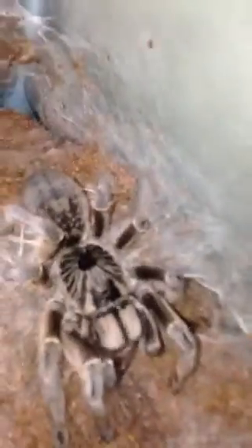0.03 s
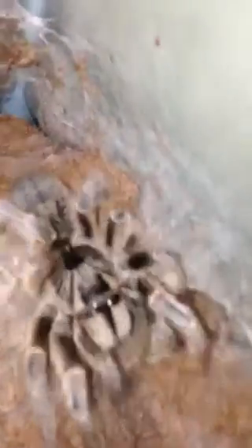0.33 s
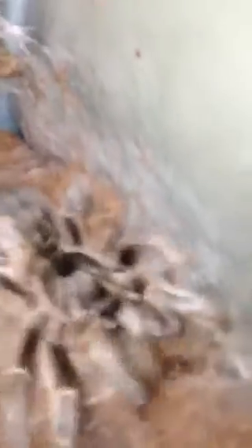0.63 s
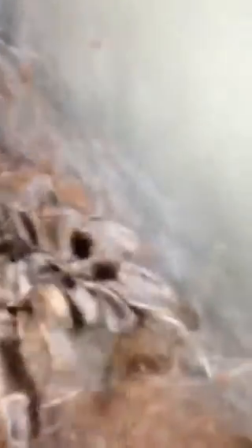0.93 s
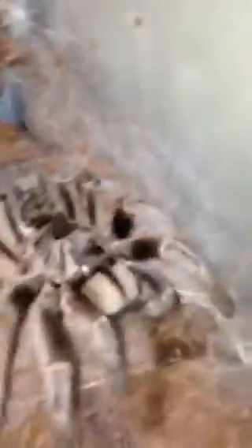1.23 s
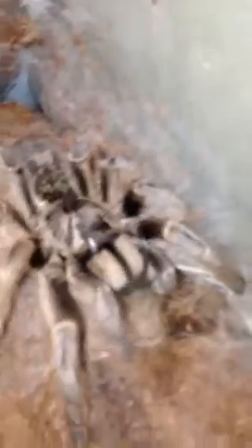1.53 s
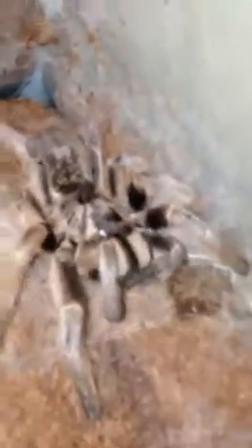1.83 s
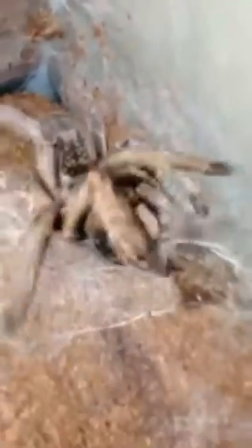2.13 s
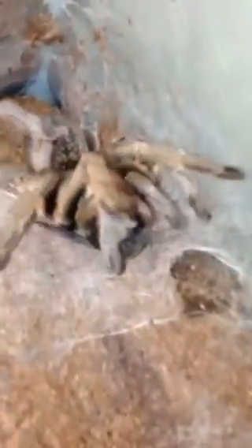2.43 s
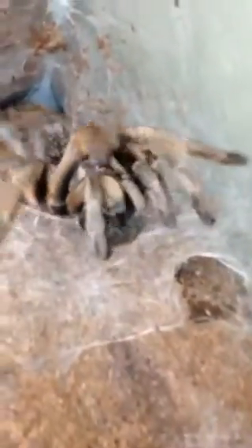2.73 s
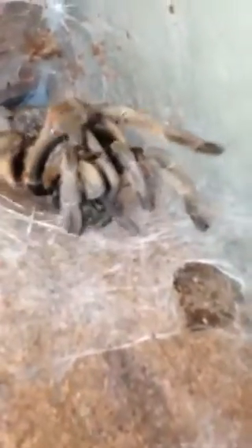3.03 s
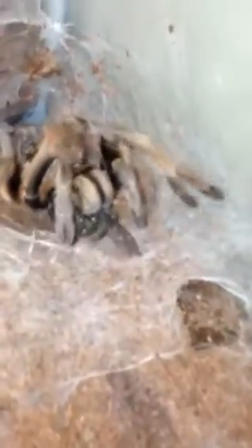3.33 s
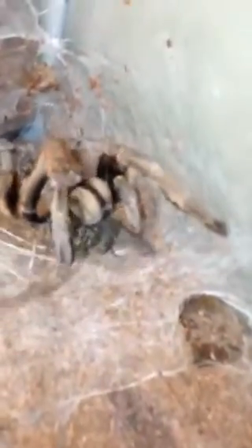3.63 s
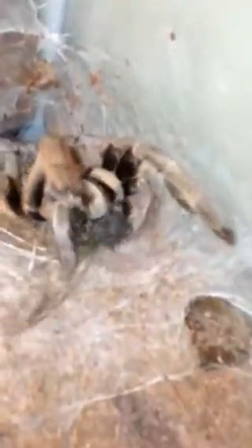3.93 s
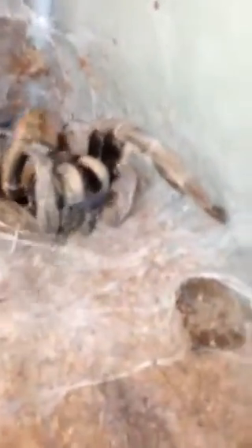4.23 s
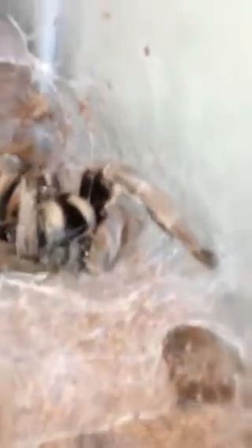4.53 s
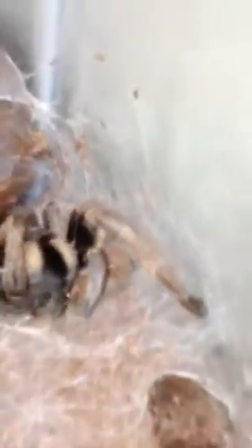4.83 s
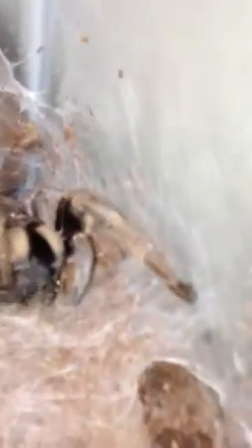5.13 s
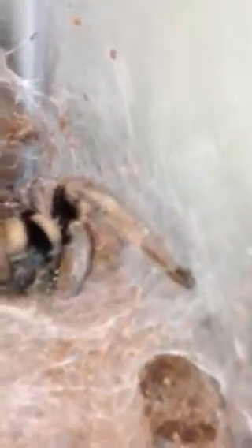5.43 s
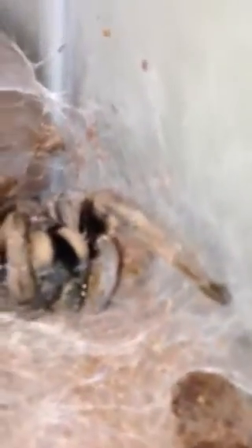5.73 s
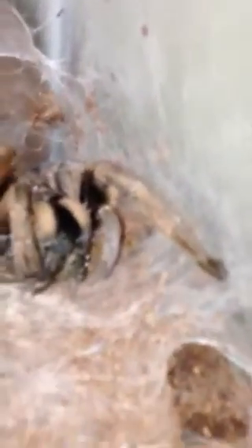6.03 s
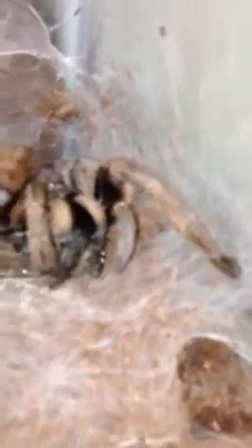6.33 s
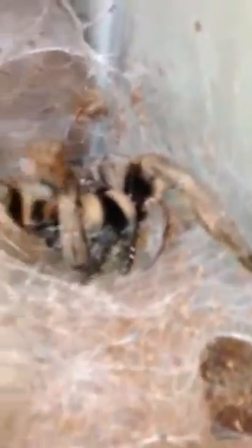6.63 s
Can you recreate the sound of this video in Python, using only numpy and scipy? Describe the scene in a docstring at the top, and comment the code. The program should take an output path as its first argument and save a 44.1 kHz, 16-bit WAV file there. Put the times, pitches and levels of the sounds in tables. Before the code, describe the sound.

Close claw taps and rustling, then a cicada's dry wing rattle that stalls as a tarantula holds it, followed by a few shell crunches.

```python
"""A cicada's wings beat in a dry rattle, about 34 times a second, then stall as a tarantula holds it.
Each beat is a slap, a scrape and a puff of air. Claws tap on the bark and legs scrabble through silk.
The spider shifts its weight with soft thumps, and the prey's shell crunches in its fangs.
It all sounds close up, in a small enclosure whose wall pings when knocked, in a quiet room."""
import sys
import numpy as np
from scipy import signal
from scipy.fft import rfft, irfft
from scipy.io import wavfile

SR = 44100
rng = np.random.default_rng(int(sys.argv[2]) if len(sys.argv) > 2 else 0)


def store_wav(level_fs):
    """Save 16-bit WAV to argv[1]."""
    pcm = np.round(np.clip(np.atleast_2d(level_fs), -1, 1) * 32767)
    wavfile.write(sys.argv[1], SR, pcm.T.astype(np.int16))


N = 295029
TIME = np.arange(N) / SR


# Spells of wing beating. Each row: start in seconds, end in seconds, treble boost in dB.
WING_SPELLS = [(1.3564, 2.35, 5.5), (2.4224, 2.5, 8), (2.5729, 2.875, 10), (2.943, 2.96, 17)]
# Wing speed, racing and then stalling. Each row: time in seconds, beats per second.
WING_SPEED = [(1.356, 27.94), (1.39, 30.75), (1.5, 30.86), (1.58, 37.71), (1.62, 34.94), (1.76, 31.91),
              (1.785, 38.66), (1.81, 35.14), (1.96, 35.53), (2.1, 40.6), (2.18, 34.51), (2.31, 34.31),
              (2.42, 32.69), (2.45, 31.19), (2.57, 33.67), (2.75, 33.52), (2.78, 31.5), (2.81, 22.94)]
# Force of a beat. Each row: time in seconds, slap in dB, scrape in dB, pushed air in dB.
WING_FORCE = [(1.356, -35.5, -45, -33.5), (1.425, -43, -42, -37), (1.58, -35.5, -40, -39.5),
              (1.61, -33.5, -30, -41), (1.78, -39.5, -33.5, -39.5), (1.811, -29.5, -31, -41.5),
              (1.896, -28, -28.5, -34.5), (1.975, -41.5, -39, -40), (2.01, -41, -33, -39),
              (2.062, -33, -33, -34), (2.113, -32.5, -32.5, -63), (2.137, -43, -42, -46),
              (2.2, -40, -32.5, -40.5), (2.25, -40, -40, -47), (2.28, -34, -35.5, -48),
              (2.453, -37.5, -41, -46), (2.573, -33.5, -39, -42), (2.62, -41, -41, -48.5),
              (2.78, -37.5, -42.5, -42.5), (2.812, -32.5, -37.5, -41), (2.857, -41, -44, -41.5),
              (2.94, -35, -40.5, -41)]
# Tone of a wing. Each row: frequency in Hz, relative level in dB.
WING_TONE = [(590, -54), (1000, -7), (1580, -2), (2080, 3.5), (2280, -3), (2910, 2.5), (4010, -2.5),
             (4920, 1.5), (10500, 0.5), (12500, 3.5), (14600, 2.5), (15500, -13)]

def wing_rattle():
    """One wing slap follows another, no two alike; harder strokes drag longer."""
    beats = []
    for s, end, treble_db in WING_SPELLS:
        while s < end:
            slap_db, scrape_db, air_db = values_at(WING_FORCE, s) + 0.5 * rng.standard_normal(3)
            drag_ms = 2.36 + 0.2 * max(scrape_db + 41, 0)  # -41 dB is a light scrape
            beats.append((s, slap_db, scrape_db, drag_ms, air_db, treble_db))
            s += 1 / values_at(WING_SPEED, s)[0]
    return contacts(beats, WING_TONE, snap_ms=1.0, ring_db=-16, ring_ms=2.2, snap_bright_db=6.5,
                    slips_per_s=11000, grit_db=0.6, puff_hz=562, flutter_db=-6.5)


# Claws landing on bark. Each row: start in seconds, snap in dB, scrape in dB, treble boost in dB.
CLAW_STEPS = [(.2637, -35, -31, 6), (.3149, -33.5, -40, 4.5), (.4101, -42, -49, 7), (.5324, -41, -43, 22),
              (.5569, -48, -38, 9), (.5887, -39.5, -41, 6), (.6168, -41.5, -51, 7), (.7382, -34, -50, -7),
              (.8895, -42.5, -39, -4), (.9386, -34.5, -35, -8), (.9746, -48.5, -42, -18),
              (.9852, -42, -46, 11), (1.2514, -42.5, -46.5, 6), (3.4344, -52.5, -54, 13),
              (3.5861, -42, -47, 12), (3.7177, -33, -36.5, 26), (3.8478, -52, -49.5, 8),
              (3.9029, -46, -48, 18), (3.9263, -41, -37, 7), (3.936, -49, -44, -1),
              (3.9744, -41.5, -48, -2), (4.0196, -42, -42.5, 6), (4.128, -56, -48, 8),
              (4.1609, -46.5, -48.5, 24), (4.5118, -52.5, -45, 3)]
# A claw or thread letting go. Each row: start in seconds, level in dB, treble boost in dB.
CLAW_CLICKS = [(0.343, -49, 24), (0.3644, -33, 1), (0.4181, -42.5, 10), (0.5406, -41.5, -15),
               (1.0018, -39.5, 26), (1.0366, -31.5, -4), (1.1639, -44, -20), (1.2026, -39, 5),
               (1.2403, -48, 7), (1.3131, -29, -15), (3.1281, -48, 29), (3.8625, -44, -1),
               (4.0362, -43.5, 17), (4.3911, -35, 9)]
# Tone of a claw. Each row: frequency in Hz, relative level in dB.
CLAW_TONE = [(590, -23), (1000, -2), (1170, -60), (1410, -8), (1530, -10), (2160, -3.5), (2680, -1),
             (4700, -9), (6630, -7), (7530, -8), (9910, -4), (14500, -6.5), (15500, -10.5)]

def claw_taps():
    """A step knocks the bark harder the more it scrapes; a click has little scrape or knock."""
    steps = [(s, snap_db, scrape_db, 3.23, -49 + 0.4 * (scrape_db + 41), treble_db)
             for s, snap_db, scrape_db, treble_db in CLAW_STEPS]
    clicks = [(s, level_db, level_db - 7.5, 2.2, level_db - 27, treble_db)
              for s, level_db, treble_db in CLAW_CLICKS]
    return contacts(steps + clicks, CLAW_TONE, snap_ms=0.94, ring_db=-20.5, ring_ms=2.6,
                    snap_bright_db=4.0, slips_per_s=11000, grit_db=3.0, puff_hz=473, flutter_db=5.5)


# The shell giving way. Each row: start in seconds, snap in dB, crumble in dB,
# milliseconds until the crumble peaks, low knock in dB.
SHELL_BREAKS = [(3.0569, -26, -33.5, 2.5, -55), (3.0661, -32.5, -49, 2.6, -60),
                (5.5546, -38.5, -31.5, 5.1, -45.5), (5.728, -49, -55, 3, -60),
                (5.7552, -41, -42.5, 2.1, -53.5), (5.9564, -42.5, -30.5, 4.8, -49),
                (6.019, -51, -52, 2.7, -60), (6.2647, -60, -51, 5.7, -52.5), (6.4561, -67, -54, 6.5, -47.5),
                (6.5068, -55, -46.5, 2.26, -47.5)]
# Tone of the shell. Each row: frequency in Hz, relative level in dB.
SHELL_TONE = [(410, -109), (700, -3), (1370, 7), (2110, 1.5), (2560, 3), (2800, -1), (3400, 0.5),
              (3820, -4.5), (7900, -1.5), (10600, -5.5), (15500, -14.5)]

def shell_crunches():
    """Fangs break the shell; a clean snap is brighter than a crumble."""
    breaks = [(s, snap_db, crumble_db, peak_ms, knock_db, 9.5 + 0.3 * (snap_db - crumble_db))
              for s, snap_db, crumble_db, peak_ms, knock_db in SHELL_BREAKS]
    return contacts(breaks, SHELL_TONE, snap_ms=0.37, ring_db=-16, ring_ms=2.8, snap_bright_db=6.5,
                    slips_per_s=10000, grit_db=1.5, puff_hz=606, flutter_db=16.5)


# Tone of pushed air. Each row: frequency in Hz, relative level in dB.
AIR_TONE = [(80, -3.5), (200, -6), (400, 1), (750, 4.5), (1100, -3.5), (2000, -20.5)]

def contacts(hits, tone, snap_ms, ring_db, ring_ms, snap_bright_db,
             slips_per_s, grit_db, puff_hz, flutter_db):
    """Each hit of a wing, claw or fang is a sharp snap, a swell of tiny slips and a low puff of air."""
    out, ms = np.zeros(N), np.arange(2048) * 1000 / SR
    body, air = tone_filter(tone), tone_filter(AIR_TONE)
    halves = [signal.butter(2, 4500, side, fs=SR, output="sos") for side in ("low", "high")]
    for s, snap_db, scrape_db, drag_ms, puff_db, treble_db in hits:
        snap_fade = np.exp(-ms / snap_ms) + from_db(ring_db) * np.exp(-ms / ring_ms)
        snap = rng.standard_normal(len(ms)) * snap_fade
        snap[4] = 4  # a spike gives the snap its hard edge
        progress = ms / max(drag_ms, 1)  # the swell peaks when this reaches 1
        swell = (progress * np.exp(1 - progress)) ** 2.8 + 0.041 * np.exp(-ms / 11)
        scrape = slips(len(ms), slips_per_s, grit_db) * swell
        for burst, level_db, bright_db in ((snap, snap_db, treble_db + snap_bright_db),
                                           (scrape, scrape_db, treble_db)):
            toned = through(burst, body)
            middle, treble = (one_ms_energy(signal.sosfilt(half, toned)) for half in halves)
            add(out, s, from_db(level_db) * one_ms_energy(middle - from_db(bright_db) * treble))
        # the air pulls, then pushes, as the stroke ends: later if it drags
        scrape_share = 1 / (1 + from_db(snap_db - scrape_db) ** 2)
        cycles = (ms - 0.8 - 1.337 * scrape_share * drag_ms) * puff_hz / 1000
        puff = one_ms_energy(np.sin(2 * np.pi * cycles) * np.exp(-(cycles / 0.5) ** 2))
        flutter = one_ms_energy(through(rng.standard_normal(len(ms)) * swell, air))
        add(out, s, from_db(puff_db) * one_ms_energy(puff + from_db(flutter_db) * flutter))
    return out


# Legs moving in the fight, then as the spider settles its grip.
# Each row: time in seconds, silk rustle in dB, bark rumble in dB.
LEGS_FIGHTING = [(.08, -80, -81), (.22, -49.5, -67.5), (.3, -54, -54.5), (.42, -59.5, -62),
                 (.63, -60.5, -62.5), (.77, -52, -58.5), (.87, -58, -60), (.97, -53.5, -56),
                 (1.02, -60.5, -63.5), (1.12, -56, -63.5), (1.24, -60.5, -61.5), (1.35, -51.5, -56),
                 (1.47, -59, -57), (1.7, -47, -54), (1.8, -57.5, -54), (2.06, -52, -52.5),
                 (2.22, -50.5, -53.5), (2.39, -66.5, -65.5), (2.54, -70, -70), (2.62, -60, -57),
                 (2.79, -56.5, -60), (2.9, -69, -77), (3.02, -69, -82)]
LEGS_SETTLING = [(3.66, -70, -85), (3.74, -57.5, -67), (3.81, -71, -76), (3.94, -57.5, -68),
                 (4.07, -66.5, -75), (4.14, -60.5, -66.5), (4.23, -63, -59.5), (4.3, -57, -57.5),
                 (4.4, -70.5, -70.5), (4.6, -69, -83)]
# Tone of the bark. Each row: frequency in Hz, relative level in dB.
BARK_TONE = [(21, -58), (35, -10), (64, -3.5), (193, 5.5), (270, -0.5), (370, 3), (494, -9), (629, -6.5),
             (864, -8.5), (1300, -26), (1690, -11), (2860, -120)]

def scrabbling_legs():
    """Legs drag through silk and the bark rumbles under them."""
    s, silk_db, bark_db = np.transpose(LEGS_FIGHTING + LEGS_SETTLING)
    silk = level_curve(s, silk_db) * silk_crackle()
    rubbing = slips(N, per_s=2500, spread_db=2.5) * from_db(5.15 * wander(per_s=60))
    rumble = rms_one(through(rubbing, tone_filter(BARK_TONE)))
    return silk + level_curve(s, bark_db) * rumble


# Tone of rubbed silk. Each row: frequency in Hz, relative level in dB.
SILK_TONE = [(590, -85), (1000, -10), (1790, -3.5), (2180, 2), (2840, 2.5), (4700, -1), (8740, 1),
             (11600, 0), (14600, 2), (15500, -0.5)]

def silk_crackle():
    """Threads catch and let go in clumps, each size of thread in its own range of pitch."""
    out, edges_hz = np.zeros(N), np.geomspace(1000, 16000, num=10)
    clumps_db = 3.5 * wander(per_s=220)
    snaps = slips(N, per_s=300, spread_db=4.6)  # the strongest threads sound in every range at once
    for low, high in zip(edges_hz, edges_hz[1:]):
        threads = slips(N, per_s=1800, spread_db=4.0) + snaps
        out += band_pass(threads * from_db(clumps_db + 4.0 * wander(per_s=250)), low, high)
    return rms_one(through(out, tone_filter(SILK_TONE)))


# Weight landing on the bark. Each row: start in seconds, level in dB, pitch in Hz.
WEIGHT_SHIFTS = [(0.276, -54, 194), (0.741, -48.5, 191), (.943, -42, 185), (0.976, -49, 360),
                 (2.058, -39, 198), (2.1, -43.5, 200), (3.717, -59, 383), (3.752, -53.5, 477),
                 (4.204, -47.5, 165), (4.229, -37, 180), (4.255, -44.5, 175), (4.678, -59, 200),
                 (5.229, -57, 222)]

def bark_thumps(rise_s=0.001, decay_s=0.0096, roughness=0.74):
    """A soft blow rocks the bark in a short, uneven low ring."""
    out, t = np.zeros(N), TIME[:8192]
    for s, level_db, hz in WEIGHT_SHIFTS:
        shake = rms_one(band_pass(rng.standard_normal(len(t)), hz * 0.91, hz * 2))
        envelope = (1 - np.exp(-t / rise_s)) * np.exp(-t / decay_s)
        add(out, s, from_db(level_db) * envelope * (np.sin(2 * np.pi * hz * t) + roughness * shake))
    return out


# Notes the wall rings at. Each row: pitch in Hz, relative level in dB, seconds to fade by 60 dB.
WALL_NOTES = [(2097, 2, 0.049), (2420, -4, 0.033), (2896, -0.5, 0.02)]
# Knocks on the wall. Each row: start in seconds, level in dB, tilt toward the high notes in dB.
WALL_HITS = [(.264, -47.5, -19), (.975, -46, 6), (1.036, -42.5, 17), (1.165, -46, 1), (1.312, -42, 21),
             (1.84, -42, 15), (1.869, -47, 28), (2.008, -49, -15), (2.213, -45, 22), (2.307, -44, 19),
             (3.863, -57, 30), (4.021, -60, 24)]

def wall_pings():
    """Where a knock lands decides which of the wall's notes ring most."""
    out, t = np.zeros(N), TIME[:8192]
    tilt_shares = np.linspace(-0.5, 0.5, len(WALL_NOTES))
    for s, knock_db, tilt_db in WALL_HITS:
        for (hz, note_db, fade_s), share in zip(WALL_NOTES, tilt_shares):
            envelope = from_db(knock_db + note_db + tilt_db * share - 60 * t / fade_s)
            add(out, s, envelope * np.sin(2 * np.pi * hz * t))
    return out


# Air stirred at the height of the fight. Each row: time in seconds, level in dB.
GUST_LEVELS = [(1.58, -90), (1.68, -58.5), (2.1, -58), (2.18, -81)]

def wing_draught():
    """The racing wings fan the air in low gusts."""
    gusts = rms_one(band_pass(rng.standard_normal(N), 58, 115))
    return level_curve(*np.transpose(GUST_LEVELS)) * gusts


def enclosure_echo(x, level_db=-16.5, fade_s=0.072):
    """Close walls throw back a faint, short echo."""
    t = TIME[:8192]
    tail = rng.standard_normal(len(t)) * from_db(-60 * t / fade_s) * (1 - np.exp(-t / 0.0039))
    return from_db(level_db) * through(x, tail / np.linalg.norm(tail))


# Tone of the still room. Each row: frequency in Hz, relative level in dB.
ROOM_TONE = [(15, -40), (25, -31), (49, -5.5), (107, -4.5), (183, -9.5), (267, -11.5), (666, -11.5),
             (1270, -14.5), (1660, -14.5), (2170, -16.5), (3830, -14.5), (14300, -17), (15500, -18.5)]

def room_hush(level_db=-67.5):
    """The room is a faint, steady noise, strongest in the bass."""
    return from_db(level_db) * rms_one(through(rng.standard_normal(N), tone_filter(ROOM_TONE)))


def slips(size, per_s, spread_db):
    """Tiny slips at random moments, a few much stronger than the rest."""
    strength = from_db(spread_db * np.minimum(rng.exponential(1, size), 4))
    return rng.standard_normal(size) * strength * (rng.random(size) < per_s / SR)


def wander(per_s):
    """A random course with a new value per_s times a second."""
    knots = rng.standard_normal(4000)
    return np.interp(TIME * per_s, np.arange(len(knots)), knots)


def tone_filter(points):
    """A short click with the given tone, which falls 11.7 dB an octave beyond the table's ends."""
    hz, level_db = np.transpose(points)
    octave = np.log2(np.maximum(np.fft.rfftfreq(4096, 1 / SR), 5))
    outside = np.abs(octave - np.clip(octave, np.log2(hz[0]), np.log2(hz[-1])))
    gain = from_db(np.interp(octave, np.log2(hz), level_db) - 11.7 * outside)
    fold = np.r_[1, np.full(2047, 2), 1, np.zeros(2047)]  # packs the energy at the click's start
    return irfft(np.exp(rfft(irfft(np.log(gain)) * fold)))


def through(x, impulse):
    """Give a sound the tone and tail of an impulse, keeping its length."""
    return signal.fftconvolve(x, impulse)[:len(x)]


def band_pass(x, low_hz, high_hz):
    """Keep what lies between two frequencies."""
    return signal.sosfilt(signal.butter(2, [low_hz, high_hz], "band", fs=SR, output="sos"), x)


def level_curve(s, level_db):
    """Gain over time, silent outside the curve."""
    return from_db(np.interp(TIME, s, level_db, left=-np.inf, right=-np.inf))


def values_at(curve, s):
    """Values of a curve's columns at time s."""
    times, *columns = np.transpose(curve)
    return [np.interp(s, times, column) for column in columns]


def from_db(db):
    """Turn decibels into gain."""
    return 10 ** (np.asarray(db) / 20)


def rms_one(x):
    """Scale to an average power of 1."""
    return x / np.sqrt(np.mean(x ** 2) + 1e-20)


def one_ms_energy(x):
    """Scale a burst to the energy of one millisecond at power 1."""
    return x * np.sqrt(SR / 1000 / (np.sum(x ** 2) + 1e-20))


def add(track, s, sound):
    """Mix a sound into the track from time s on."""
    start = int(s * SR)
    track[start:start + len(sound)] += sound[:N - start]


def scene():
    """Wings, claws and shell sound inside the enclosure, over the hush of the room."""
    close = wing_rattle() + claw_taps() + shell_crunches()
    close += wing_draught() + scrabbling_legs() + wall_pings() + bark_thumps()
    return (close + room_hush() + enclosure_echo(close))[None]


def record(dry):
    """Treble above 15500 Hz is cut steeply."""
    return signal.sosfilt(signal.ellip(10, .2, 70, 15500, fs=SR, output="sos"), dry)


dry = scene()
out = record(dry)
store_wav(out)
```